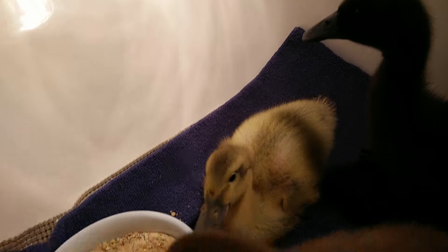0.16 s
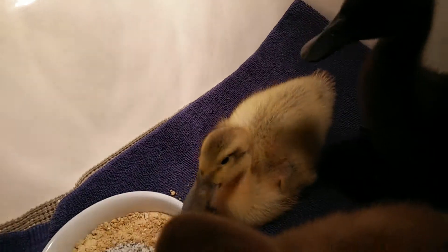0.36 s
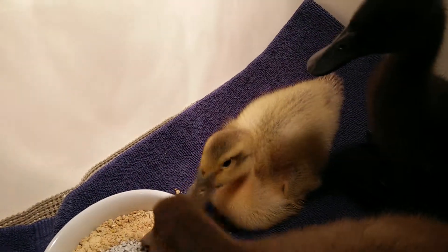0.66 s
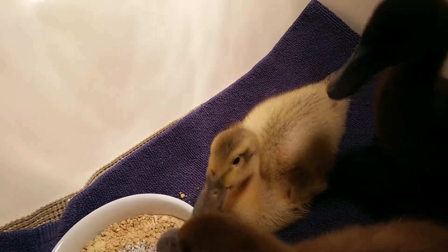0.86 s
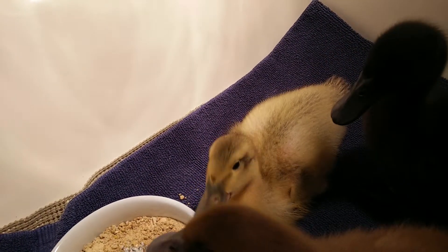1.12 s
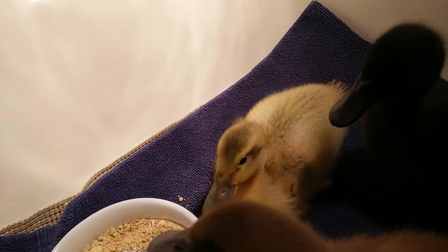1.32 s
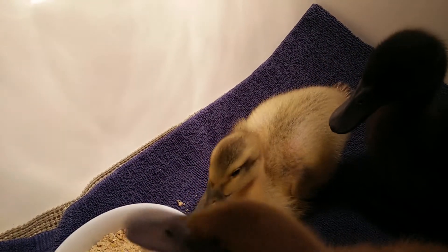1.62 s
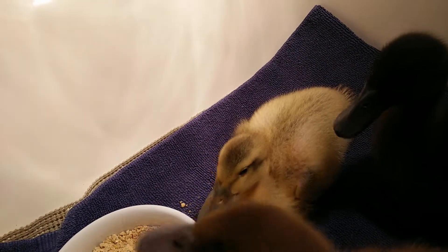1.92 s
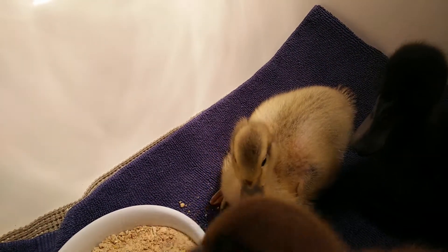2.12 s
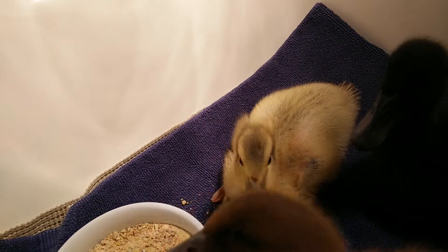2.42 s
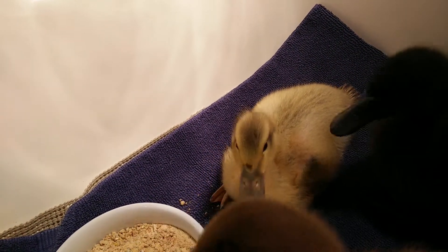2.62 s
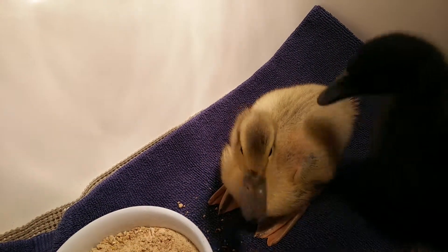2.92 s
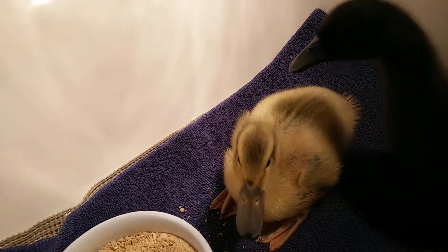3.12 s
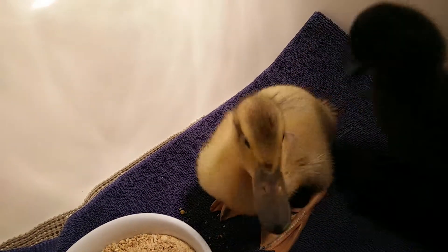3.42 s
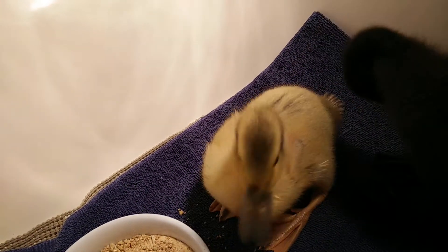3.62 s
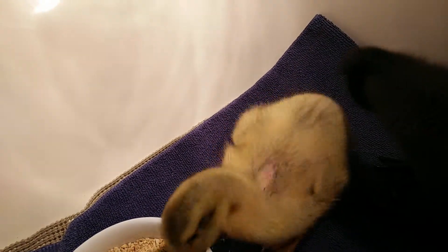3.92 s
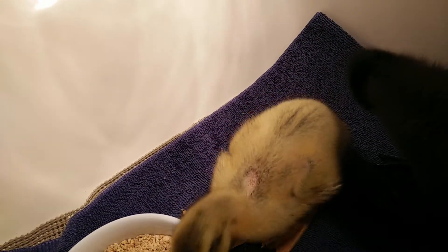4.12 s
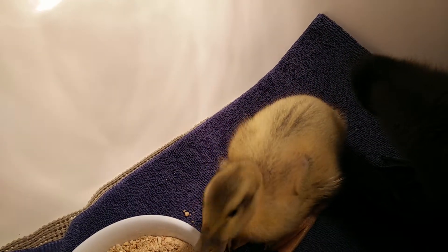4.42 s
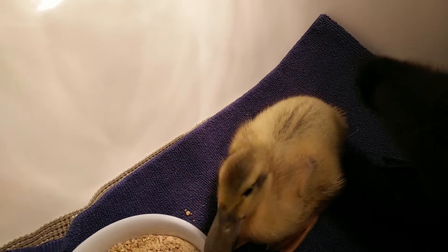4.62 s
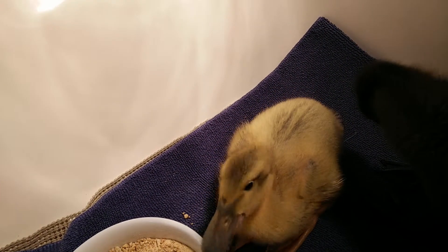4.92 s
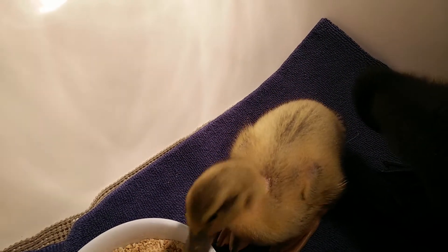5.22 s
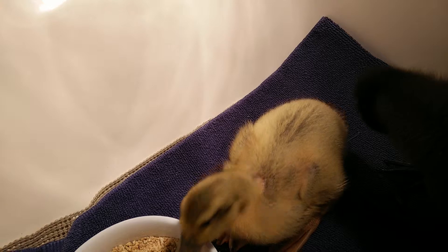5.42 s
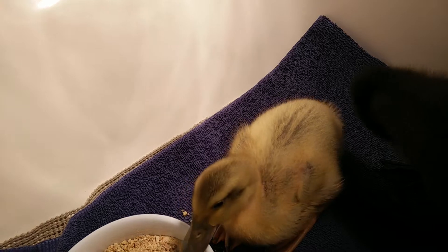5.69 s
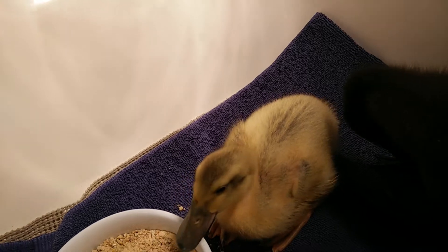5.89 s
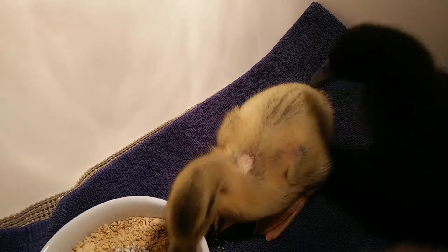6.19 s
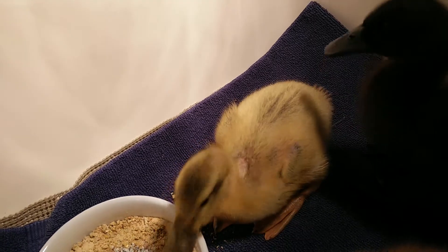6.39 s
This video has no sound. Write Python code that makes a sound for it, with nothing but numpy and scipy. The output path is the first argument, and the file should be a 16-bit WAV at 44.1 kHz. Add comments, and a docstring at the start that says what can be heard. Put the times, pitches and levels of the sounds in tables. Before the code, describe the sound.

Short, high duckling peeps mix with soft dabbling, bill clicks and rustling crumbs in a small, faintly humming indoor box.

```python
"""Ducklings feeding in a brooder

Ducklings peep close by in a small indoor box, each peep a short whistle that rises and falls.
Their bills dabble and peck at a bowl of crumbs, their feet scuff a towel, and one soft bump
shakes the floor. The walls echo the peeps and the feeding over a low hum and a faint hiss."""
import sys
import numpy as np
from scipy import signal
from scipy.fft import rfft, irfft, next_fast_len
from scipy.io import wavfile
from scipy.ndimage import uniform_filter1d, minimum_filter1d, map_coordinates

SR = 44100
rng = np.random.default_rng(int(sys.argv[2]) if len(sys.argv) > 2 else 0)


def wav_out(sig):
    """Save sig, one row per channel (or a flat mono array), as 16-bit PCM at SR to the path in sys.argv[1]."""
    wavfile.write(sys.argv[1], SR, np.round(np.clip(np.atleast_2d(sig).T, -1, 1) * 32767).astype(np.int16))


N = 288855
TOP_HZ = 15950  # upper limit of the sound


def amp(db):
    """Turn decibels into a gain."""
    return 10 ** (np.asarray(db) / 20)


def unit(x):
    """Scale a signal to an average power of 1."""
    return x / np.sqrt(np.mean(x ** 2) + 1e-20)


def along(points, hz):
    """Read between (Hz, value) points on a log frequency scale."""
    f, v = np.transpose(points)
    return np.interp(np.log(hz + 1), np.log(f), v)


def curve(rows):
    """Join (seconds, value) points into one value per sample."""
    return np.interp(np.arange(N) / SR, *np.transpose(rows))


def wobble(rate, size):
    """A smooth curve through rate random points a second."""
    return map_coordinates(rng.standard_normal(int(size * rate / SR) + 4), [np.arange(size) * rate / SR])


def filtered(x, response):
    """Scale each frequency of x by response(Hz)."""
    n = x.shape[-1]
    m = next_fast_len(n + 8192)
    return irfft(rfft(x, m) * response(np.fft.rfftfreq(m, 1 / SR)), m)[..., :n]


def noise(spectrum, size):
    """Coloured stereo noise, alike on both sides in the bass and unrelated in the treble."""
    # Each row: frequency in Hz, likeness of left and right from 0 to 1.
    likeness = [(80, 1), (250, 0.84), (700, 0.45), (2000, 0), (6000, 0)]
    turn = lambda hz: np.arccos(np.clip(along(likeness, hz), -1, 1)) / 2
    colour = lambda hz: amp(along(spectrum, hz)) * [np.cos(turn(hz)), np.sin(turn(hz))]
    mid, side = filtered(rng.standard_normal((2, size)), colour)
    return unit(np.array([mid + side, mid - side]))


def pan(left_db):
    """Gains that make the left side left_db louder than the right."""
    return amp([[left_db / 2], [-left_db / 2]])


def add(track, s, sound):
    """Mix a sound in at s seconds."""
    i = max(round(s * SR), 0)
    track[:, i:i + sound.shape[-1]] += sound[..., :N - i]


def background(hiss_db=-63):
    """A low hum wavers over the steady hiss of the room."""
    # Each row: pitch in Hz, random changes per second, level in dB.
    hum_tones = [(74.9, 9.8, -2.5), (104, 12, -10.5), (55, 17, -12.5)]
    # Each row: time in seconds, level in dB.
    hum_levels = [(0, -52), (.5, -63.5), (.8, -54.5), (1.9, -57.5), (2.15, -63), (3.5, -59.5), (4.2, -60),
                  (4.7, -59.5), (5.35, -58), (5.6, -61.5), (6.55, -62)]
    # Each row: frequency in Hz, strength in dB.
    hiss_colour = [(20, -62), (35, -40.5), (50, -20.5), (80, 8.5), (110, -8.5), (200, -15.5), (500, -23.5),
                   (1000, -30.5), (1600, -28), (3300, -34), (5000, -44), (7500, -21.5), (10000, -36.5),
                   (16000, -30)]
    t = np.arange(N) / SR
    tones = 0
    for hz, rate, db in hum_tones:
        phase = 2 * np.pi * hz * t
        tones += amp(db) * unit(wobble(rate, N) * np.sin(phase) + wobble(rate, N) * np.cos(phase))
    hum = amp(curve(hum_levels) + 0.5) * unit(tones) * pan(left_db=-2.5)
    return hum + amp(hiss_db) * noise(hiss_colour, N) * pan(left_db=-2)


def strokes(rows, fall_db=14):
    """Loudness of strokes that swell and fade, each fall_db weaker one length away from its peak."""
    t = np.arange(N) / SR
    return np.sqrt(sum(amp(db - fall_db * np.abs(t - s) / length) ** 2 for s, length, db in rows))


def crumb_ticks(count=2400, centre_hz=7400, scatter=0.17, decay_cycles=4, size_db=3.2):
    """Single crumbs shift, each a tiny ping with its own pitch and size."""
    t = np.arange(200) / SR
    starts = rng.integers(0, N - len(t), (count, 1))
    hz = np.minimum(centre_hz * np.exp(scatter * rng.standard_normal((count, 1))), TOP_HZ)
    sizes = amp(size_db * np.minimum(rng.exponential(size=(count, 1)), 4))
    phases = rng.uniform(0, 2 * np.pi, (2, count, 1))
    pings = sizes * np.exp(-t * hz / decay_cycles) * np.sin(2 * np.pi * hz * t + phases)
    samples = (starts + np.arange(len(t))).ravel()
    return unit(np.array([np.bincount(samples, side.ravel(), N) for side in pings]))


def crumb_rustle(grain_db=-3, tick_db=-4, clump_db=3):
    """Crumbs crackle in tiny clumps, louder when a bill stirs them."""
    # Each row: time in seconds, level in dB.
    rustle_levels = [(0, -65), (.45, -67.5), (.68, -72.5), (1.65, -69.5), (2.3, -72.5), (2.75, -77.5),
                     (3.35, -65.5), (3.65, -71.5), (3.87, -63), (4.13, -70.5), (4.25, -62.5), (4.7, -63),
                     (5.3, -74.5), (6.15, -68), (6.55, -68)]
    # Each row: time of the peak in seconds, length in seconds, level in dB.
    stirs = [(.79, .04, -55.5), (1.19, .18, -58.5), (3.08, 0.056, -62.5), (3.55, 0.07, -64),
             (4.025, 0.065, -54), (4.19, 0.046, -55), (4.94, 0.27, -63), (5.19, .05, -59.5),
             (5.39, 0.016, -50.5), (5.505, 0.015, -46.5), (5.64, 0.24, -59.5), (5.88, 0.097, -61.5),
             (6.335, 0.036, -56.5), (6.425, 0.1, -65.5)]
    # Each row: frequency in Hz, strength in dB.
    crunch_colour = [(400, -5.5), (1000, -7.5), (1600, -6), (3200, -6.5), (4600, -4.5), (7200, 3.5),
                     (9500, 1), (12000, -13), (16000, -18)]
    # Each row: frequency in Hz, boost or cut of the rustle in dB.
    down_and_cloth = [(3000, 0), (7000, -2), (10000, -4.5), (12500, 3.5), (16000, 3.5)]
    grains = unit(amp(-wobble(900, N))) * noise(crunch_colour, N)
    stirring = np.hypot(amp(curve(rustle_levels)), strokes(stirs))
    clumps = amp(clump_db * wobble(70, N))
    crumbs = stirring * clumps * (amp(grain_db) * grains + amp(tick_db) * crumb_ticks())
    return filtered(crumbs, lambda hz: amp(along(down_and_cloth, hz))) * pan(left_db=-6)


def dabbles(thud_db=-1, box_db=-5, rise_s=0.00822):
    """A bill dabbles in quick soft strokes, each a dull thud with a hollow ring from the box."""
    # Each row: start in seconds, number of strokes, first and last gap in seconds,
    # first and last level in dB.
    bouts = [(0.04, 4, 0.068, .052, -53.5, -56), (0.395, 3, 0.047, .048, -53.5, -58.5),
             (0.778, 2, 0.11, .108, -49.5, -51), (0.956, 3, 0.058, .061, -53, -54.5),
             (1.153, 6, 0.091, .058, -53.5, -55), (1.572, 7, 0.039, .041, -58, -56.5),
             (1.898, 2, .048, .048, -56.5, -62.5), (2.271, 2, 0.031, .038, -52, -56),
             (2.431, 4, 0.05, .089, -60, -59)]
    # Each row: frequency in Hz, strength in dB.
    thud_colour = [(30, -51.5), (55, -2), (90, 9), (160, 11), (260, -3.5), (380, -12), (550, 2.5),
                   (680, -5.5), (900, -17.5), (2000, -10.5), (5000, -53.5)]
    # Each row: pitch in Hz, level in dB, seconds to fade by 60 dB.
    box_notes = [(150.5, 10.5, 0.11), (252.5, -12.5, 0.42), (600, -2.5, 0.075), (713, -19, 0.24)]
    out, t = np.zeros((2, N)), np.arange(SR // 8) / SR
    swell = t / rise_s * np.exp(1 - t / rise_s)
    for start, count, first_gap, last_gap, first_db, last_db in bouts:
        times = start + np.cumsum([0, *np.linspace(first_gap, last_gap, count - 1)])
        for s, db in zip(times, np.linspace(first_db, last_db, count)):
            thud = amp(thud_db) * swell * noise(thud_colour, len(t))
            box = amp(box_db) * ring(box_notes, t) * (1 - np.exp(-t / rise_s))
            add(out, s - rise_s / 2, amp(db) * (thud + box))
    return out * pan(left_db=-1)


def ring(notes, t):
    """A struck object rings on its own fading notes, a little differently each time."""
    return sum(amp(db + rng.normal(0, 0.84) - 60 * t / t60) * np.sin(2 * np.pi * hz * t)
               for hz, db, t60 in notes)


def wall_echo(sound, tail_db):
    """The near walls throw back a few quick copies, then the room's echo dies away."""
    # Each row: left and right delay in milliseconds, level in dB.
    bounces = [(2.3, 7.8, -13), (4.6, 3.8, -16.5), (7.1, 8.2, -19), (11.3, 10.1, -30.5), (15.2, 18, -15.5)]
    # Each row: frequency in Hz, seconds to fade by 60 dB.
    fade_times = [(200, 0.21), (2200, 0.27), (5000, 0.25), (12000, 0.019)]
    hz, t, spectrum = signal.stft(rng.standard_normal((2, SR // 2)), SR, nperseg=256)
    fading = amp(-60 * t / along(fade_times, hz)[:, None])
    tail = signal.istft(spectrum * fading, SR, nperseg=256)[1]
    tail = amp(tail_db) * tail / np.linalg.norm(tail[0])
    echo = np.pad(tail, ((0, 0), (SR // 100, 0)))  # the tail starts 10 ms late
    for left_ms, right_ms, db in bounces:
        echo[0, round(left_ms * SR / 1000)] += amp(db)
        echo[1, round(right_ms * SR / 1000)] += amp(db)
    return signal.fftconvolve(sound, echo, axes=1)[:, :N]


def pitch_arches(peeps):
    """For each sample: the pitch, the place in the peep (-1 start, 0 top, 1 end) and the peep's row."""
    pitch, place, row = np.zeros(N), np.zeros(N), np.zeros(N, int)
    for k, (s, rise, fall, low_hz, top_hz, pointed, *_) in enumerate(peeps):
        i = np.arange(round(s * SR), round((s + rise + fall) * SR))
        position = np.interp(i / SR, [s, s + rise, s + rise + fall], [-1, 0, 1])
        hz = low_hz + (top_hz - low_hz) * np.abs(np.cos(np.pi * position / 2)) ** pointed
        higher = hz > pitch[i]  # where peeps overlap, the higher one wins
        i = i[higher]
        pitch[i], place[i], row[i] = hz[higher], position[higher], k
    return pitch, place, row


def ducklings(jitter=0.0022, shimmer_db=1.05, join_width=0.021, press_db=28, rasp_db=2.5, ends_db=-5):
    """One side of the bird's voice box whistles an arch of pitch; the other joins in near the top."""
    # Each row: start, rise and fall in seconds, lowest and top pitch in Hz, how pointed the arch is,
    # level in dB, fade from top to end in dB, second and upper harmonics in dB, second voice's pitch
    # as a multiple of the first's, its level in dB, left over right in dB, left lead in milliseconds.
    peeps = [ (0.128, .030, .047, 1598, 2730, 1.3, -44.5, 6.5, -19, -18, 1.2, -34, -6.5, 0.054),
             (0.23, 0.045, 0.027, 1560, 2500, 1.52, -41.5, 5.5, -18, -26.5, 1.32, -18, -2.5, 0.11),
             (0.868, 0.032, .037, 1434, 2059, 0.98, -41.5, -2, -25, -12, 1.28, -13.5, -3, 0.032),
             (1.057, 0.023, 0.024, 1508, 1865, .9, -35.5, 1.5, -24.5, -25, 1.43, -26.5, 7, -0.22),
             (1.099, .022, 0.046, 1585, 3073, 1.4, -41.5, 6, -15.5, -17, 1.2, -33, -6.5, 0.12),
             (1.203, 0.032, .023, 1420, 2265, .6, -32, -0.5, -21.5, -25, 1.076, -1, -1, -0.083),
             (2.762, 0.026, 0.033, 1420, 1890, 1, -37.5, -4.5, -18.5, -17, 1.37, -48, -3.5, 0.098),
             (3.043, 0.025, 0.043, 1430, 2205, .85, -44.5, -8, -21.5, -12, 1.275, -6.5, -2.4, 0.04),
             (3.157, 0.037, 0.075, 1560, 2075, .55, -42.5, 0, -26, -29, 1.2, -22, 8.5, 0.097),
             (3.194, 0.065, 0.037, 1662, 2390, 1.2, -42.5, 2.5, -19, -23.5, 1.2, -22.5, -4.2, 0.072),
             (3.301, 0.064, 0.014, 1700, 2286, 2.4, -35, -5, -23.5, -23.5, 0.71, -33, 1.5, .1),
             (3.679, .026, .047, 1528, 2795, 0.97, -43, -3, -10, -15.5, 0.98, -37, -3.5, -0.092),
             (3.78, 0.026, .035, 1438, 1890, 1.2, -41, 0, -17, -31, 0.82, -57, 6.5, -0.2),
             (3.843, .051, .034, 1506, 2286, 1.9, -38.5, 0.5, -23, -33, 1.25, -20.5, 2.5, 0.14),
             (3.970, .031, 0.025, 1428, 2215, 1.35, -37.5, 1, -35, -45, 1.16, -35, 5.5, 0.12),
             (4.64, .031, 0.056, 1482, 2240, 1.06, -39.5, 9.5, -15.5, -42, 1.23, -20, 2, 0.11),
             (4.762, .037, .043, 1524, 2140, 1.28, -37, 5.5, -26, -27.5, 1.25, -25, 1.5, 0.13),
             (5.592, .015, .035, 1495, 1610, 1, -49.5, 5, -28, -7, 1.3, -10, 11, 0.039),
             (5.689, .013, 0.031, 1493, 1630, 1, -40, 1.5, -18, -23, 1.26, -19, 13, 0.035)]
    # The throat's resonance. Each row: pitch in Hz, boost or cut in dB.
    throat = [(1450, -17.5), (1800, -14.5), (2000, -0.5), (2150, -2.5), (2300, 0), (2450, -1.5),
              (2750, 1.5), (2880, -19.5), (3100, -17)]
    # The colour of the upper harmonics. Each row: frequency in Hz, boost or cut in dB.
    bill = [(4500, -2), (6300, -5), (7200, 9.5), (8200, 1.5), (9500, -5.5), (14000, -14)]
    arch, place, row = pitch_arches(peeps)
    voiced = arch > 0
    soft_edges = uniform_filter1d(minimum_filter1d(1. * voiced, size=130), size=130)[voiced]
    arch, place, n = arch[voiced], place[voiced], voiced.sum()
    settings = np.transpose(peeps)[4:, row[voiced]]
    top_hz, _, db, fade_db, octave_db, upper_db, ratio, second_db, left_db, lead_ms = settings
    below_top = np.abs(1 - arch / top_hz)
    pitch = arch * (1 + jitter * wobble(506, n))
    lead_s = np.array([[.5], [-.5]]) * lead_ms / 1000
    phase_of = lambda hz: 2 * np.pi * (np.cumsum(hz) / SR + hz * lead_s)
    phase = phase_of(pitch)
    whistle = np.sin(phase)
    harmonics = [(2, octave_db)]
    harmonics += [(k, upper_db - 4 * (k - 3) + along(bill, k * arch)) for k in (3, 4, 5)]
    # harmonics flutter, and are brightest where the bird presses hardest
    for k, harmonic_db in harmonics:
        strength = amp(harmonic_db - press_db * below_top + rasp_db * wobble(452, n))
        whistle += strength * np.sin(k * phase + 0.52 * wobble(462, n))
    # the closer the two sides are tuned, the longer they sound together
    joined = amp(second_db) * np.exp(-(below_top * (ratio - 1) / join_width) ** 2 / 2)
    tone = (whistle + joined * np.sin(phase_of(ratio * pitch))) / np.sqrt(1 + joined ** 2)
    shape_db = along(throat, arch) - fade_db * place + ends_db * place ** 4
    level_db = db + shape_db + shimmer_db * wobble(290, n)
    out = np.zeros((2, N))
    out[:, voiced] = np.sqrt(2) * tone * soft_edges * amp(level_db + np.array([left_db, -left_db]) / 2)
    return out


def towel_scuffs(drag_db=3):
    """Feet drag unevenly over the cloth with a low, soft noise."""
    # Each row: time of the peak in seconds, length in seconds, level in dB.
    scuffs = [(.14, 0.23, -56.5), (.44, 0.071, -58), (1.2, 1.56, -67.5), (1.83, 0.23, -66),
              (2.33, 0.16, -66), (4.78, .06, -57.5), (4.94, 0.16, -55.5), (5.3, 1, -71.5),
              (5.9, 0.19, -67.5)]
    # Each row: frequency in Hz, strength in dB.
    towel_colour = [(60, -11.5), (120, 12.5), (200, 8.5), (280, 4), (380, -3), (550, 4), (750, -12),
                    (1200, -4.5), (1900, -22), (3000, -12.5), (12000, -43.5)]
    drag = unit(amp(drag_db * wobble(90, N)))
    return strokes(scuffs) * drag * noise(towel_colour, N) * pan(left_db=-1)


def pecks(knock_db=6, snap_db=-20, snap_trade=0.4):
    """A hard bill clicks shut, knocks the bowl and snaps a crumb."""
    # Each row: start in seconds, level in dB, extra level for the bowl's knock in dB.
    hits = [(0.757, -57, -14), (1.0067, -51, -9.5), (1.2868, -51.5, -13), (1.4963, -50, -62),
            (1.5656, -51, -53), (1.692, -49, -52), (1.8425, -46.5, -43.5), (1.9948, -50, -16),
            (2.0253, -48, -34), (2.9734, -57.5, -59), (3.0075, -58, 1), (3.1484, -50, -23),
            (3.1975, -52.5, -60), (3.232, -50, -19), (3.3607, -46.5, -58), (3.394, -54.5, -14.5),
            (3.5017, -50.5, -53), (3.533, -52, -14), (3.554, -50, -44), (3.9466, -47.5, -17.5),
            (4.151, -40.5, -18.5), (4.4155, -42.5, -17), (4.524, -46.5, -13), (4.6124, -61.5, 0.5),
            (4.6658, -56.5, 3), (4.7242, -38.5, -20), (4.8335, -40, -20), (5.003, -38.5, -21),
            (5.1153, -41, -16.5), (5.1756, -40, -22), (5.341, -48.5, -13.5), (5.4486, -45.5, -12.5),
            (5.5678, -37, -21), (5.692, -55, -61), (5.782, -64.5, 10), (5.88, -45, -15), (6.0136, -47, -14),
            (6.068, -58, -51), (6.1015, -54, -48), (6.16, -60, -3.5), (6.318, -51, -26),
            (6.415, -48.5, -15.5)]
    # Each row of these three: frequency in Hz, strength in dB.
    click_colour = [(300, -16), (2500, -6.5), (4200, -4), (7000, 7), (9000, -1), (11000, -66), (16000, -46)]
    knock_colour = [(100, -0.5), (450, 3), (750, -2), (1300, 5.5), (2500, -2.5), (4000, -13), (9000, -63)]
    snap_colour = [(6000, -24), (10000, 9.5), (13000, 0), (16000, -15)]
    click_s, knock_s, snap_s = 0.015, 0.032, 0.009  # time to fade by 60 dB
    out, t = np.zeros((2, N)), np.arange(SR // 12) / SR
    for s, db, bowl_db in hits:
        click = noise(click_colour, len(t)) * amp(-60 * t / click_s)
        knock = noise(knock_colour, len(t)) * amp(knock_db + bowl_db - 60 * t / knock_s)
        # a peck lands on a crumb or on the bowl, so more knock means less snap
        snap = noise(snap_colour, len(t)) * amp(snap_db - snap_trade * bowl_db - 60 * t / snap_s)
        add(out, s, amp(db) * (click + knock + snap))
    return out * pan(left_db=-2)


def scrapes(chatter_db=4):
    """Light rubbing makes brief scrapes and squeaks, each one band of noise."""
    # Each row: start and length in seconds, centre and width of the band in Hz, level in dB.
    rubs = [(0.77, 0.039, 2170, 3620, -65.5), (4.76, 0.4, 8900, 902, -67.5), (4.839, .33, 1920, 513, -59.5),
            (4.838, .18, 564, 224, -62), (4.881, .009, 4650, 600, -51.5), (4.989, .12, 1010, 380, -60),
            (5.573, .14, 9640, 2420, -62.5), (5.693, 0.11, 9200, 992, -73)]
    out = np.zeros((2, N))
    for s, length, hz, width, db in rubs:
        n = int(length * SR)
        band = filtered(rng.standard_normal((2, n)), lambda f: 1 / (1 + (2 * (f - hz) / width) ** 4))
        swell = np.sin(np.pi * np.arange(n) / n)
        add(out, s, amp(db + chatter_db * wobble(116.8, n)) * unit(band) * swell)
    return out * pan(left_db=-5)


def bumps(rise_s=0.0034):
    """A soft weight lands on the floor and settles; nudges make the bowl or box ring on one note."""
    # Each row: start in seconds, level in dB.
    landings = [(4.087, -36.5), (4.124, -44), (4.142, -42.5)]
    # Each row: pitch in Hz, level in dB, seconds to fade by 60 dB.
    floor_notes = [(74.2, 3, 0.18), (109.1, -5.5, 0.19), (205.5, -10, 0.34), (229.6, -16, 0.15),
                   (430, -12, 0.042), (651, -12, 0.031)]
    # Each row: start in seconds, pitch in Hz, level in dB, seconds to fade by 60 dB.
    nudges = [(4.667, 714, -37.5, 0.02), (4.90, 520, -81, 0.39), (5.05, 451, -74, 5),
              (5.88, 354, -49, 0.052)]
    out, t = np.zeros((2, N)), np.arange(SR // 2) / SR
    soft_start = 1 - np.exp(-t / rise_s)
    for s, db in landings:
        add(out, s, amp(db) * ring(floor_notes, t) * soft_start)
    for s, *note in nudges:
        add(out, s, ring([note], t) * soft_start)
    return out * pan(left_db=-3)


def scene():
    """The ducklings peep and feed in the brooder."""
    voices = ducklings()
    feeding = pecks() + dabbles() + crumb_rustle() + towel_scuffs() + scrapes()
    echoes = wall_echo(voices, tail_db=-13) + wall_echo(feeding, tail_db=-11.5)
    return voices + feeding + echoes + bumps() + background()


def record(dry, low_hz=42):
    """The microphone loses the deepest bass, and everything above TOP_HZ is cut."""
    return filtered(dry, lambda hz: (hz < TOP_HZ) * (hz / low_hz) ** 4 / np.sqrt(1 + (hz / low_hz) ** 8))


dry = scene()
out = record(dry)
wav_out(out)
```